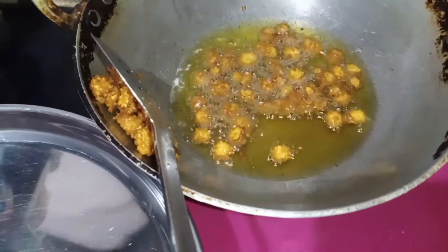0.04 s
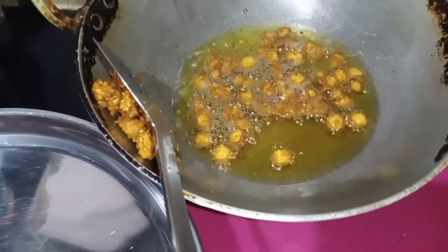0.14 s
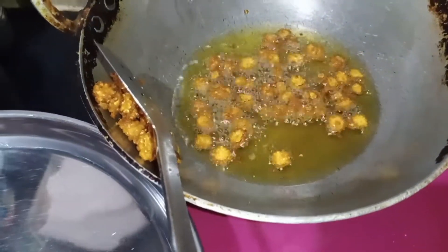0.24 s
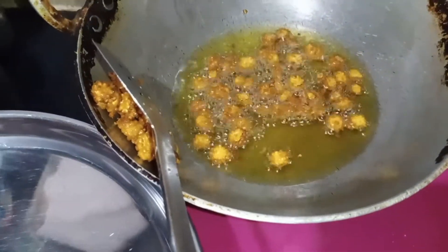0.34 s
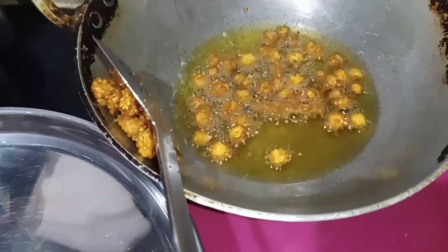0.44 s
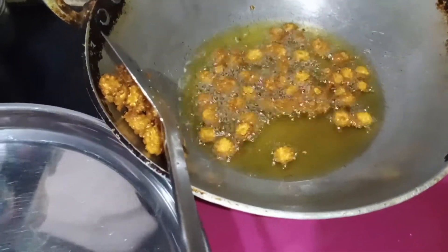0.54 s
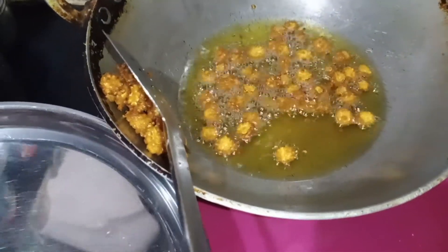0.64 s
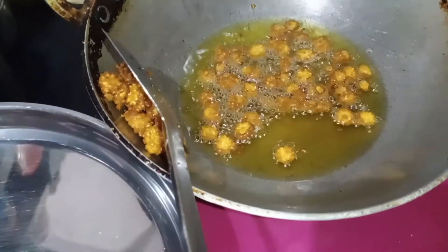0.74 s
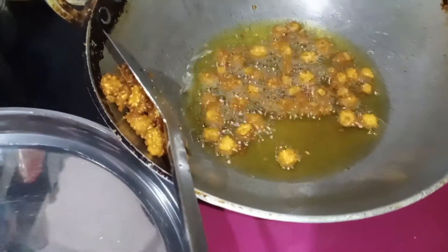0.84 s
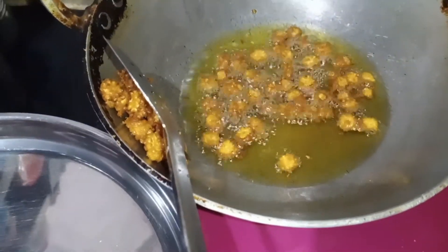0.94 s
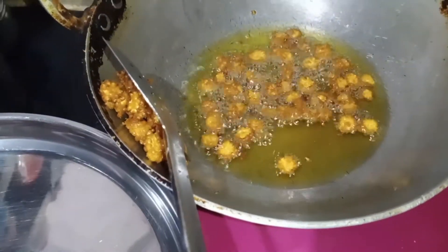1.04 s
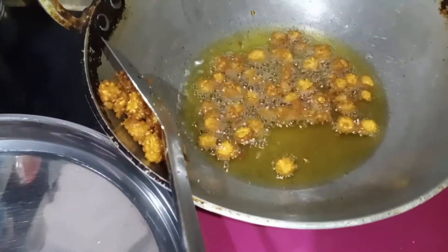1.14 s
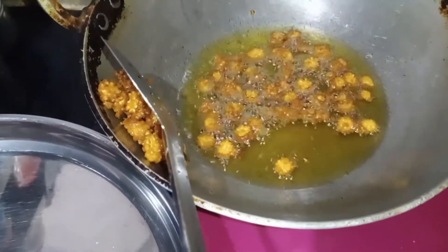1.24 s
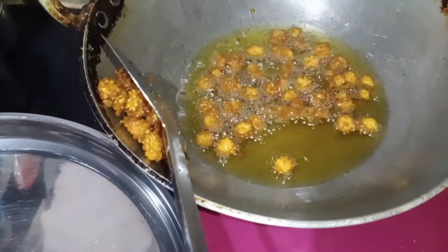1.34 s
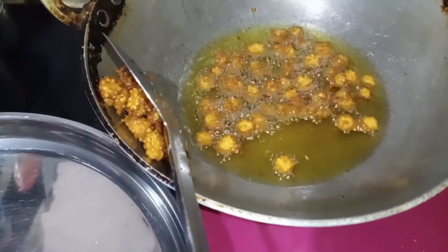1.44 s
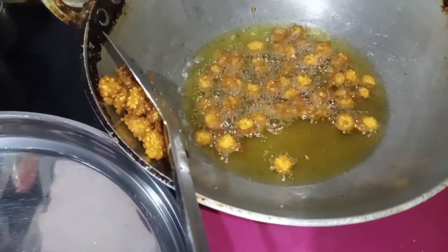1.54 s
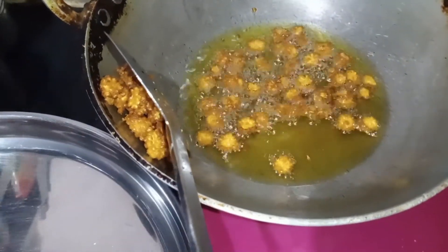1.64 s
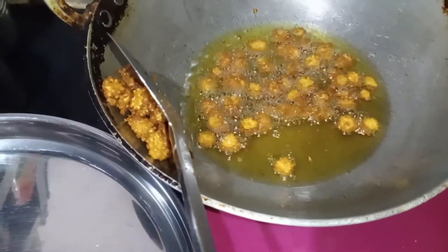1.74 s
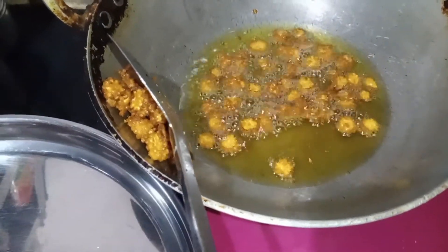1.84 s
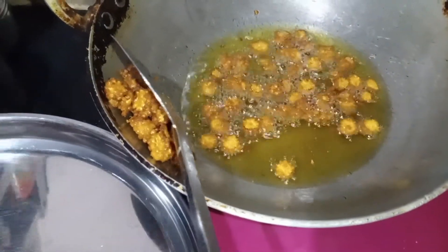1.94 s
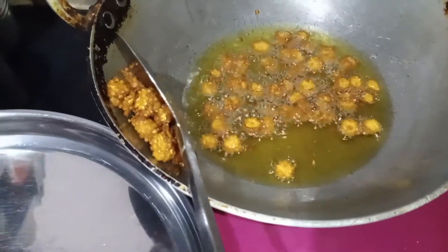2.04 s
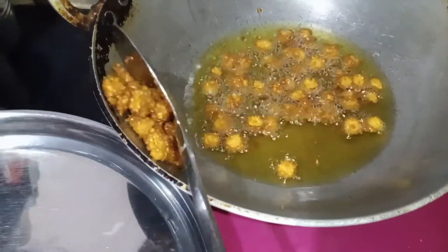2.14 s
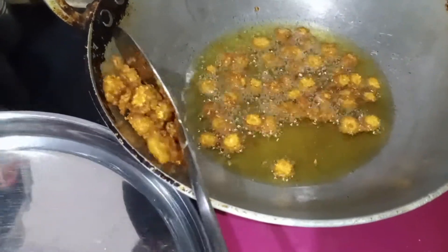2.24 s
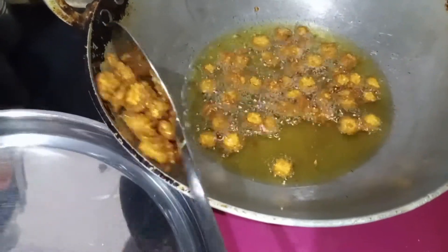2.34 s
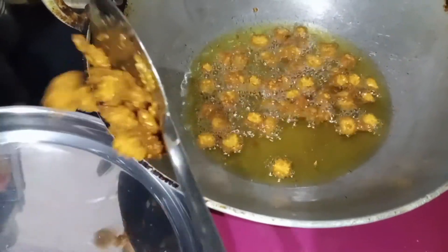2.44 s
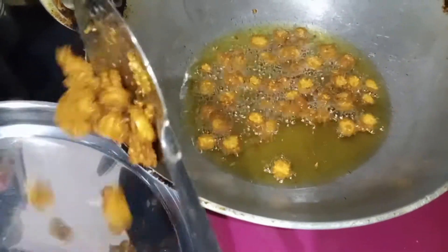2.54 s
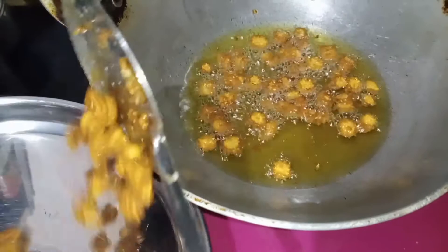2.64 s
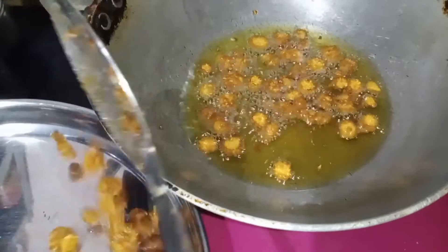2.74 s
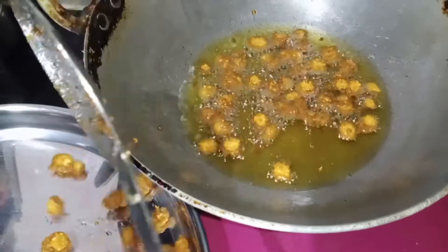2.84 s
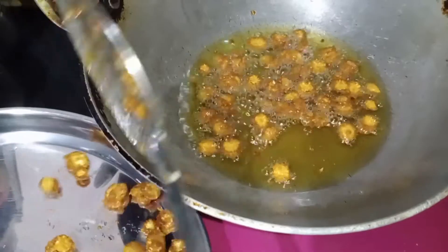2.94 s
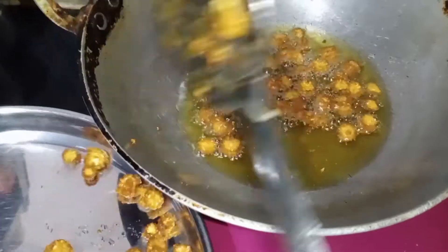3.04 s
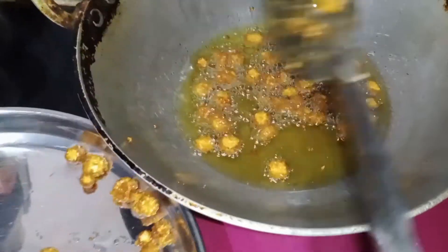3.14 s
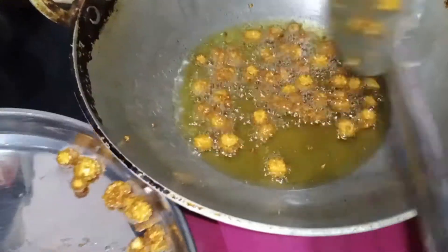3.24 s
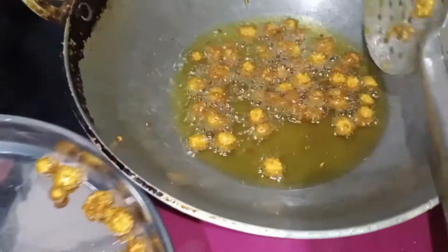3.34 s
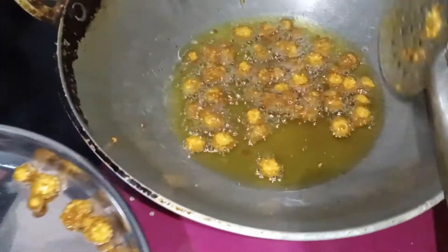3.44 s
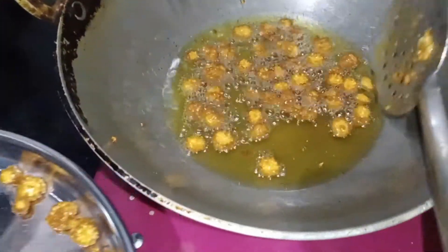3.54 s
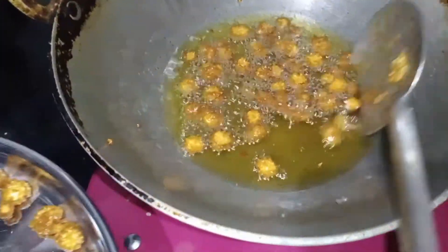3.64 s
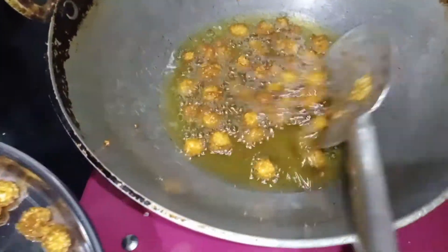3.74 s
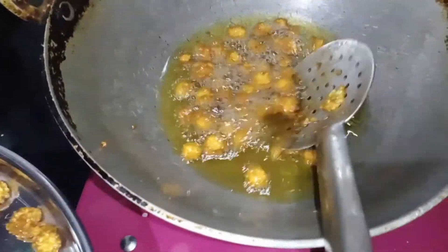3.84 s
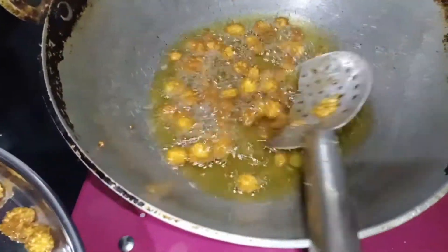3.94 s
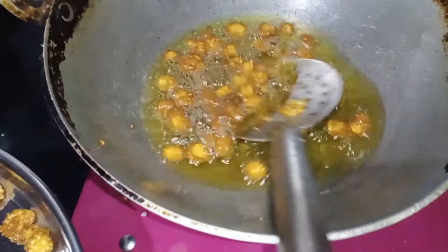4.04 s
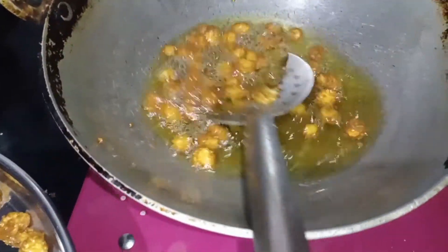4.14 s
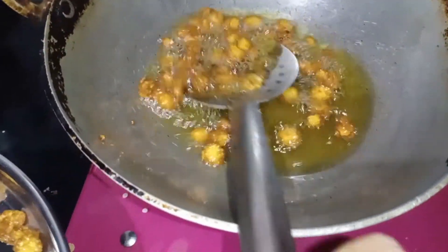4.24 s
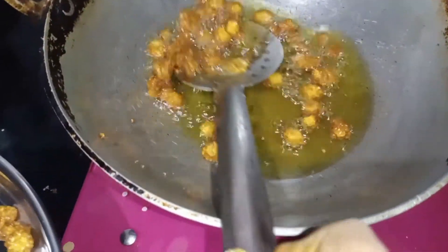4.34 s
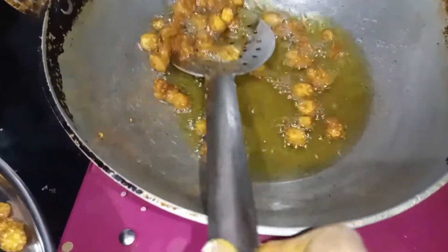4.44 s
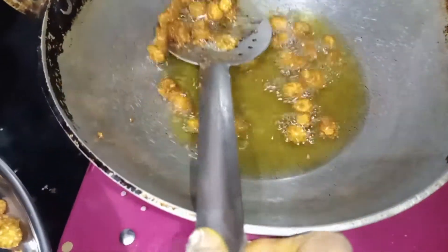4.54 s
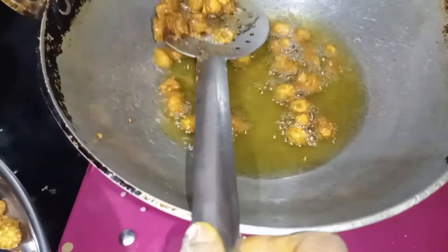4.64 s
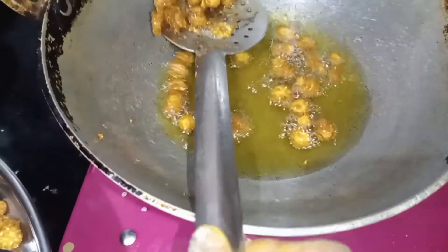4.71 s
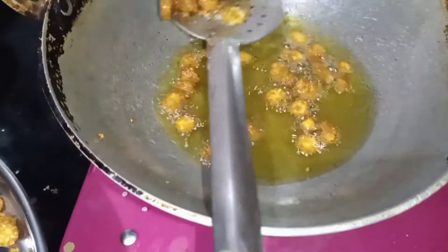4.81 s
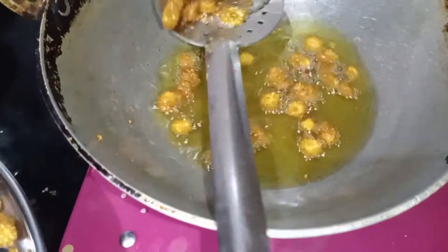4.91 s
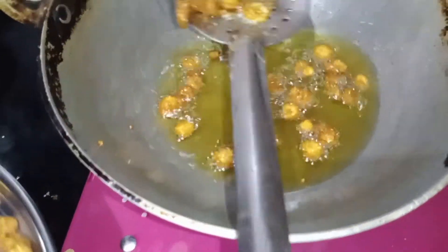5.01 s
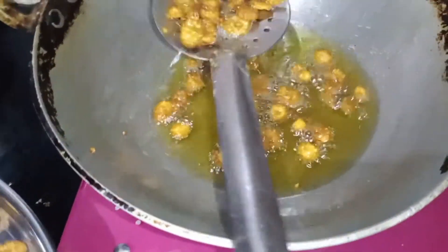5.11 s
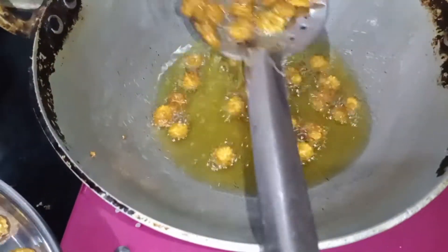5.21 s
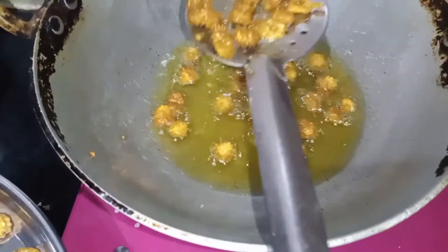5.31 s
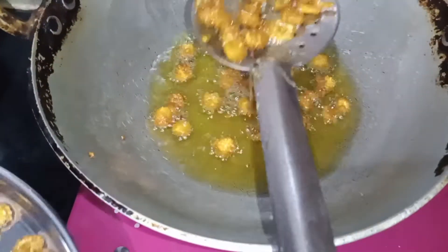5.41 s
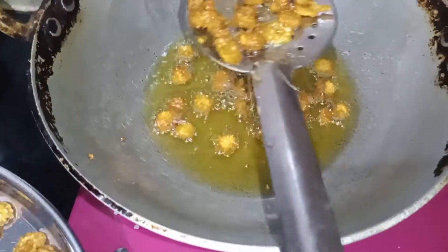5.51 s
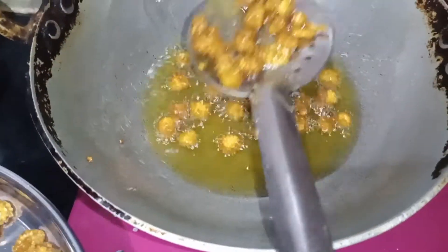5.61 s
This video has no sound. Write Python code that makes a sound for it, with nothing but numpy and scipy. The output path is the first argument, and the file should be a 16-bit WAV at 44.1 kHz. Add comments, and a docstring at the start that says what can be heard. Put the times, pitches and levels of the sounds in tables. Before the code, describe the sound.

Small battered fritters sizzle and crackle steadily in a wok of hot oil, close to the microphone in a small room. A slotted steel spoon scrapes the wall and tips a load onto a steel plate, which rattles and rings. The spoon clinks back and scoops again while the wok knocks hollowly on its stand. The frying carries on, with a faint handling rumble underneath.

```python
"""Hot oil sizzles close by, as steam bursts out of small battered fritters frying in a wok.
A slotted steel spoon scrapes a load up the wall and tips it onto a steel plate, which rattles and rings.
The spoon clinks back and scoops again, and the wok knocks on its stand with a hollow clunk.
Underneath, the hand that holds the microphone makes a faint rumble."""
import sys
import numpy as np
from scipy import signal
from scipy.fft import rfft, irfft, next_fast_len
from scipy.io import wavfile
from scipy.ndimage import uniform_filter1d

SR = 44100
rng = np.random.default_rng(int(sys.argv[2]) if len(sys.argv) > 2 else 0)


def pcm_store(signal):
    """Save signal as 16-bit PCM."""
    levels = np.round(np.clip(np.atleast_2d(signal), -1, 1) * 32767)
    wavfile.write(sys.argv[1], SR, levels.astype(np.int16).T)


N = 250035
TIME = np.arange(N) / SR   # seconds since the scene began
AGE = np.arange(SR // 2) / SR   # seconds since one short sound began

# How hard the oil fries, rising when the spoon stirs it: time_s, level_db
FRYING_LEVEL = [(0.0, -38.5), (1.93, -38.5), (2.76, -34), (2.98, -38), (3.4, -39.5), (3.76, -37.5),
                (4.48, -34.5), (5.32, -37.5), (5.67, -37.5)]
# Tone of the fine, high fizz of bursting steam bubbles: pitch_hz, level_db
FIZZ_TONE = [(2500, -36), (4700, -19.5), (5500, -7.5), (6300, 1.5), (6900, 4), (7600, 0), (8500, -8),
             (9500, -14), (11400, -26), (12800, -20), (15300, -14)]
# Tone of their coarser, lower crackle: pitch_hz, level_db
CRACKLE_TONE = [(300, -18), (600, -41), (800, -21), (1000, -20.5), (1270, -8), (1450, -12.5), (1950, -9.5),
                (2300, -5.5), (2900, 5.5), (3600, -0.5), (4200, -0.5), (4900, -12.5), (7000, -13),
                (12000, -11.5)]
# Notes that ring when spoon meets wok: pitch_hz, level_db, fade_s (the time to fall 60 dB)
SPOON_NOTES = [(1207, 4.5, 0.21), (1365, 5, 0.1), (1703, 4, 0.49), (2750, 7, 0.28), (2670, -7, 0.14),
               (2900, 3.5, 0.24), (3520, -4.5, 0.024), (3700, 17.5, 0.062), (4018, 14, 0.16),
               (4700, -21, 0.06), (6210, 13, 0.011), (6790, -16.5, 0.024), (6700, 17, 0.085)]


def sizzle():
    """Steam escapes from the batter in thousands of tiny bursts, in flurries, with a few larger spits."""
    fizz_level, = levels_over_time(FRYING_LEVEL)
    crackle_level = fizz_level * from_db(-8)
    flurry = from_db(1.5 * drift(per_s=60) + .8 * drift(per_s=9))
    fizz = unit_power(shape_tone(clicks(9000 * flurry, spread_db=3.1), FIZZ_TONE))
    crackle = unit_power(shape_tone(clicks(7000 * flurry, spread_db=2.5), CRACKLE_TONE))
    spits = clicks(60, spread_db=2.5)
    fizz += from_db(-27) * unit_power(shape_tone(spits, FIZZ_TONE))
    crackle += from_db(-7) * unit_power(shape_tone(spits, CRACKLE_TONE))
    return fizz_level * fizz + crackle_level * crackle


def bubbles():
    """Some bubbles stay whole long enough to ring briefly at a pitch of their own."""
    frying, = levels_over_time(FRYING_LEVEL)
    plops = np.zeros(N)
    for hz in np.geomspace(1200, 4200, 16):
        ring = resonate(clicks(25, spread_db=3.5), hz, width_hz=hz / 22)
        plops += from_db(level_at_pitch(CRACKLE_TONE, hz)) * ring / np.sqrt(hz)
    return from_db(-17) * frying * unit_power(plops)


def wok_bowl():
    """The bubbling stirs the hollow notes of the wok, each fading now and then on its own."""
    # Hollow notes of the bowl: pitch_hz, width_hz, level_db (relative to the frying)
    bowl_notes = [(487, 35, -41.5), (768, 65, -34), (1249, 29, -29), (1560, 46, -33), (1770, 140, -31.5)]
    frying, = levels_over_time(FRYING_LEVEL)
    bursts = clicks(1500, spread_db=-2)
    out = np.zeros(N)
    for hz, width_hz, db in bowl_notes:
        level = from_db(db + 5 * np.minimum(drift(per_s=14), .5))
        out += level * hollow_note(bursts, hz, width_hz)
    return frying * out


def pops():
    """A spit of oil or a light touch of the spoon gives a short, sharp tick."""
    # Ticks from the wok: start_s, peak_db, pitch_hz
    ticks = [(0.9593, -29, 3020), (1.511, -28.5, 2950), (1.9072, -20.5, 3200), (1.922, -25, 3300),
             (1.9724, -31, 3300), (2.035, -23.5, 3100), (2.0542, -23.5, 3240), (4.485, -21, 3350),
             (4.5, -26, 3100), (4.8542, -30, 2880), (4.921, -25.5, 2440), (5.001, -29.5, 3070),
             (5.4032, -25.5, 2660)]
    out = np.zeros(N)
    for start_s, peak_db, hz in ticks:
        snap = noise_burst(fade_s=0.027)
        ring = unit_power(resonate(snap, hz, width_hz=270))
        fizz = from_db(-0.5) * unit_power(shape_tone(snap, FIZZ_TONE))
        add(out, start_s, with_peak(ring + fizz, peak_db))
    return out


def glugs():
    """While the fritters float undisturbed, larger pockets of steam come up with a low flutter."""
    first_s, last_s, glugs_per_s, pitch_hz = 0.36, 1.7, 9, 765
    out = np.zeros(N)
    for k, (late, size, detune) in enumerate(rng.standard_normal((20, 3))):
        start_s = first_s + (k + .3 * late) / glugs_per_s
        glug = resonate(noise_burst(fade_s=0.2), pitch_hz * (1 + .025 * detune), width_hz=30)
        if start_s < last_s:
            add(out, start_s, with_peak(glug, -57 + 3 * size))
    return out


def spoon_clinks():
    """Steel hits steel: a sharp crack, then a ring cut short by hand and oil."""
    # The spoon hits the wok: start_s, crack_db, treble_db, ring_db, favoured_hz
    hits = [(2.1965, -11.5, 4.5, -27, 3500), (2.426, -17.5, 42, -47, 2740), (3.4986, -7, -7.5, -19.5, 2580),
            (3.5841, -16.5, -14, -36, 3040), (3.6545, -9.5, 11, -31, 1700), (3.697, -10, -3, -25.5, 4400),
            (3.749, -18.5, 5, -32, 4030), (3.7856, -19, 2, -37, 2640), (3.9491, -27, 23, -32.5, 1700),
            (4.0667, -22.5, 1, -35, 2970), (4.4828, -22, 1, -35, 3420), (4.5044, -41, 10, -46, 3020)]
    # Tone of the crack: pitch_hz, level_db
    crack_tone = [(180, -63), (300, -6), (562, -60), (1050, -26), (1440, -23), (1700, 16), (1970, -15),
                  (2740, 15.5), (3400, 4.5), (4000, 0), (4350, -13.5), (5130, -4), (6790, 16),
                  (10100, -15.5), (15500, -54)]
    return from_db(-2) * strikes(hits, SPOON_NOTES, crack_tone, crack_gain_db=-8, crack_fade_s=.026,
                                 shimmer_fade_s=0.09, shimmer_db=-3.5, favour_db=8)


def spoon_scrapes():
    """The spoon's edge catches and slips many times a second, shaking wok and spoon."""
    # The spoon slides on the wok: start_s, length_s, grind_db, hiss_db, swell_db
    strokes = [(2.014, 0.053, -55, -25, -3), (2.15, 0.065, -37, -28, -16), (2.276, .14, -41, -31.5, 2),
               (2.45, 0.1, -48, -37, 5), (3.5, 0.068, -39.5, -45, -2), (3.57, 0.24, -30.5, -39, -3.5),
               (3.908, 0.13, -35.5, -31, 9.5), (4.46, 0.12, -47.5, -50, -6), (5.382, .025, -47, -29, 4)]
    # Tone of the grinding: pitch_hz, level_db
    grind_tone = [(240, -77), (400, -14), (617, -6.5), (731, 6), (838, 3), (962, 9), (1550, 9), (1680, 8.5),
                  (1910, 0), (2770, 11), (3800, -1.5), (4050, 8.5), (5000, -2), (6500, -52), (11000, -120)]
    grind_level, hiss_level = np.zeros((2, N))
    for start_s, length_s, grind_db, hiss_db, swell_db in strokes:
        grind_level += from_db(grind_db) * push(start_s, length_s, swell_db, rise_s=0.036, fade_s=0.24)
        hiss_level += from_db(hiss_db) * push(start_s, length_s, swell_db, rise_s=0.036, fade_s=0.18)
    slips = clicks(5000 * from_db(3 * drift(per_s=90)), spread_db=1.5)
    shaken = steel_shimmer(slips, fade_s=0.037, level_db=2)
    ringing = sum(from_db(db) * resonate(slips, hz, 2.8 / fade_s) for hz, db, fade_s in SPOON_NOTES)
    grind = from_db(-2.5) * unit_power(shape_tone(shaken, grind_tone))
    grind += from_db(-4.5) * unit_power(ringing)
    hiss = from_db(-7.5) * unit_power(shape_tone(shaken, FIZZ_TONE))
    return grind_level * grind + hiss_level * hiss


def plate_landings():
    """Crisp fritters tumble onto thin steel, which rings on between landings."""
    # Fritters land: start_s, strength_db, favoured_hz
    landings = [(2.545, -15, 3340), (2.561, -19, 3300), (2.5912, -13, 2930), (2.612, -12, 3220),
                (2.6496, -10, 2700), (2.664, -11, 2650), (2.691, -11, 2620), (2.719, -10, 3600),
                (2.743, -10.5, 2630), (2.767, -11.5, 2350), (2.79, -11.5, 2640), (2.802, -12.5, 2050),
                (2.866, -16, 2060), (2.883, -18.5, 3330), (2.919, -18, 2830), (2.949, -20, 3020),
                (2.971, -22, 3300), (3.009, -26, 2250)]
    # Notes of the plate: pitch_hz, level_db
    plate_notes = [(220.7, -48), (382.2, -46), (721.4, -45), (936.7, -45), (1168, -44), (1443, -54),
                   (1755, -46), (2073, -40), (2412, -36), (2767, -42), (2848, -43), (3149, -46),
                   (3273, -35), (3316, -42), (3499, -51), (3693, -46), (3978, -52), (4145, -50),
                   (4231, -52), (4603, -56), (4850, -60), (5243, -51), (5669, -48), (5803, -50),
                   (6325, -46), (6724, -43), (6918, -47), (7176, -44), (7289, -51), (7445, -49)]
    # Tone of a landing's crack: pitch_hz, level_db
    crack_tone = [(70, -28), (150, -17), (370, -0.5), (520, -0.5), (750, 2.5), (1500, -5.5), (2200, -5.5),
                  (3100, -2.5), (4200, -2.5), (4900, -10), (6900, 5), (8700, -6), (11000, -22),
                  (15300, -19)]
    # The food makes the low notes die sooner.
    notes = [(hz, db, 0.35 * min(hz / 2500, 1) ** 0.13) for hz, db in plate_notes]
    hardest_db = max(db for _, db, _ in landings)
    hits = []
    for start_s, db, favoured_hz in landings:
        treble_db = 0.22 * (hardest_db - db)   # small pieces sound thinner
        ring_db = db - 14.5
        hits.append((start_s, db, treble_db, ring_db, favoured_hz))
    return strikes(hits, notes, crack_tone, crack_gain_db=-14.5, crack_fade_s=0.075,
                   shimmer_fade_s=0.32, shimmer_db=0, favour_db=7)


def plate_thumps():
    """A soft, heavy clump shakes only the plate's low notes."""
    # The first heavy clumps land: start_s, level_db
    clumps = [(2.544, -32.5), (2.591, -30.5)]
    # Low notes of the plate: pitch_hz, width_hz, level_db
    low_notes = [(144, 23, -5.5), (395, 48, -1.5), (716, 66, -3)]
    weight = sum(from_db(db) * push(start_s, length_s=0.019, swell_db=0, rise_s=0.01, fade_s=.2)
                 for start_s, db in clumps)
    shake = rng.standard_normal(N)
    ringing = sum(from_db(db) * hollow_note(shake, hz, width_hz) for hz, width_hz, db in low_notes)
    return weight * unit_power(ringing)


def crumbs():
    """Hard crumbs of batter tick on the plate, one by one."""
    # Tone of a tick: pitch_hz, level_db
    tick_tone = [(2000, -30), (4200, -3), (7500, 0), (11000, -7), (15000, -7)]
    pour = push(start_s=2.55, length_s=.3, swell_db=0, rise_s=.01, fade_s=.35)
    ticks = unit_power(shape_tone(clicks(81, spread_db=1.5), tick_tone))
    return from_db(-41) * steel_shimmer(pour * ticks, fade_s=0.042, level_db=-4, spacing_hz=280)


def wok_knocks():
    """The wok, heavy with oil, rocks on its stand with short hollow clunks."""
    # The wok hits the stand: start_s, crack_db, ring_db, favoured_hz
    knocks = [(2.175, -25, -38.5, 366), (2.202, -22, -31.5, 754), (2.224, -31.5, -30, 366),
              (3.476, -21.5, -38.5, 1210), (3.504, -20, -43, 1180), (3.583, -20, -36, 729),
              (3.642, -21, -29, 1010), (3.662, -18, -33, 297), (3.702, -18.5, -28.5, 980),
              (3.73, -24, -50, 284), (3.789, -30, -35.5, 977), (4.075, -21, -25.5, 1030),
              (4.089, -25, -30, 900), (4.715, -53, -42.5, 1100)]
    # Notes of the wok: pitch_hz, level_db
    wok_notes = [(285.3, -64), (366.1, -44), (753.7, -43.5), (882.9, -41), (1007, -47.5), (1061, -65),
                 (1130, -46), (1233, -49.5), (1453, -50)]
    # Tone of a knock's crack: pitch_hz, level_db
    crack_tone = [(120, -63), (220, 1), (350, 1.5), (550, -5.5), (800, -5), (1100, -0.5), (1500, -12.5),
                  (2500, 0.5), (6000, -44)]
    ring_fade_s, treble_db = .2, -2.5
    notes = [(hz, db, ring_fade_s) for hz, db in wok_notes]
    hits = [(start_s, crack_db, treble_db, ring_db, hz) for start_s, crack_db, ring_db, hz in knocks]
    return from_db(-4) * strikes(hits, notes, crack_tone, crack_gain_db=-12.5, crack_fade_s=0.18,
                                 shimmer_fade_s=0.27, shimmer_db=0, favour_db=8)


def spoon_rubs():
    """On a film of oil the spoon slips softly and stirs only the wok's low notes."""
    # The loaded spoon rubs the wall: start_s, length_s, level_db, swell_db
    rubs = [(4.098, 0.18, -45, -18), (4.715, 0.24, -60, -6), (5.421, 0.226, -54.5, -4)]
    # Tone of the rubbing: pitch_hz, level_db
    rub_tone = [(200, -1), (330, 1), (520, 0.5), (760, 5.5), (950, 9), (1200, 2), (2000, -26)]
    pressure = sum(from_db(db) * push(start_s, length_s, swell_db, rise_s=.02, fade_s=0.32)
                   for start_s, length_s, db, swell_db in rubs)
    return from_db(-3) * pressure * unit_power(shape_tone(clicks(1500, spread_db=-3), rub_tone))


def handling():
    """A shifting grip on the microphone makes a wavering rumble, and now and then a dull thud."""
    # The grip shifts: start_s, thud_db, bump_db
    grip_shifts = [(0.19, -53.5, -40.5), (0.439, -64, -60), (0.53, -54, -64), (1.218, -49, -53),
                   (1.368, -51, -59), (1.735, -49.5, -38), (2.269, -53, -61), (3.169, -48.5, -50),
                   (3.281, -46, -40), (3.52, -53, -40), (3.681, -43, -36), (4.835, -54, -40),
                   (4.92, -50, -51), (5.498, -56, -35), (5.612, -59, -42.5)]
    # Tone of a dull bump: pitch_hz, level_db
    bump_tone = [(120, -41), (180, -9), (222, 10), (265, -6), (320, -8), (420, -21), (700, -24.5)]
    # The rumble's two notes: pitch_hz, width_hz
    rumble_notes = [(89, 15.5), (138, 10.1)]
    # Their levels, one list before the pour and one after: time_s, lower_note_db, upper_note_db
    rumble_levels = [
        [(0.0, -91, -96), (0.23, -53, -54), (0.39, -67, -78), (0.44, -60, -52), (0.6, -60.5, -64.5),
         (1.28, -50, -44), (1.3, -54, -50), (1.96, -40.5, -54), (2.15, -60, -64), (2.26, -56, -59),
         (2.45, -63.5, -75)],
        [(2.95, -90, -67), (3.21, -58, -56.5), (3.75, -41.5, -47), (4.05, -56, -55.5), (4.09, -48, -43.5),
         (4.44, -56.5, -71), (4.76, -51.5, -67), (4.98, -60, -50), (5.24, -61.5, -81), (5.48, -46, -48),
         (5.67, -63, -67)],
    ]
    out, thuds = np.zeros((2, N))
    waver_hz = 7 * (1 + .3 * drift(per_s=5))
    turns = np.cumsum(waver_hz) / SR + rng.random()
    waver = from_db(-0.5 + 4 * np.sin(2 * np.pi * turns))
    for start_s, thud_db, bump_db in grip_shifts:
        bump = shape_tone(noise_burst(fade_s=0.29), bump_tone)
        add(out, start_s, with_peak(bump, bump_db + 1.5))
        thuds += from_db(thud_db) * push(start_s, length_s=0.034, swell_db=0, rise_s=0.017, fade_s=0.11)
    for level, (hz, width_hz) in zip(levels_over_time(np.vstack(rumble_levels)), rumble_notes):
        shake = rng.standard_normal(N)
        low = resonate(resonate(shake, hz, width_hz), hz, 4 * width_hz)
        low /= np.sqrt(uniform_filter1d(low ** 2, size=1500) + 1e-18)   # the grip alone sets the level
        overtones = from_db(-32) * unit_power(shape_tone(shake, bump_tone))
        out += np.hypot(level * waver, thuds) * (low + overtones)
    return out


def room_noise():
    """The room has a very faint, steady, low noise."""
    # Tone of the noise: pitch_hz, level_db
    room_tone = [(20, 6), (45, 11), (90, 24), (200, -22), (500, -8), (1000, -21), (4000, -45)]
    return from_db(-70.5) * unit_power(shape_tone(rng.standard_normal(N), room_tone))


def room_echo(x, echo_db):
    """A small room adds a short blur of echoes, different on the left and right."""
    tails = rng.standard_normal((2, len(AGE))) * fade(0.063) * (AGE > .003)
    tails /= np.linalg.norm(tails, axis=1, keepdims=True)
    return x + from_db(echo_db) * signal.oaconvolve(x[None], tails, axes=1)[:, :N]


def strikes(hits, notes, crack_tone, crack_gain_db, crack_fade_s, shimmer_fade_s, shimmer_db, favour_db):
    """Each hit cracks and rings the steel's notes; the spot it strikes lifts those near favoured_hz."""
    cracks, ringing = np.zeros((2, N))
    hz, level_db, _ = np.transpose(notes)
    rings = np.array([np.exp(2j * np.pi * pitch_hz * AGE) * fade(fade_s) for pitch_hz, _, fade_s in notes])
    for start_s, crack_db, treble_db, ring_db, favoured_hz in hits:
        grit = clicks(30000, spread_db=2.43, size=len(AGE)) * fade(crack_fade_s)
        # Each hit has its own tilt, brighter or duller.
        tilt = [(300, -treble_db), (2000, 0), (7000, treble_db)]
        crack = shape_tone(shape_tone(grit, crack_tone), tilt)
        crack /= np.std(crack[:SR // 200])   # the first 5 ms set the level
        add(cracks, start_s, from_db(crack_db + crack_gain_db) * crack)
        nearness = np.exp(-(np.log(hz / favoured_hz) / 0.11) ** 2)
        strengths = from_db(level_db + favour_db * nearness + rng.standard_normal(len(hz)))
        strengths *= from_db(ring_db) * np.sqrt(2) / np.linalg.norm(strengths)
        phases = np.exp(2j * np.pi * rng.random(len(hz)))
        add(ringing, start_s, (strengths * phases @ rings).imag)
    return steel_shimmer(cracks, shimmer_fade_s, shimmer_db) + ringing


def steel_shimmer(x, fade_s, level_db, spacing_hz=70):
    """Thin steel adds a crowd of weak, unevenly spaced notes to whatever shakes it."""
    bins = len(AGE) // 2 + 1
    hz = spacing_hz * (np.arange(1, 801) + rng.uniform(-.4, .4, 800))
    phases = np.exp(2j * np.pi * rng.random(len(hz)))
    spectrum = np.zeros(bins, complex)
    spectrum[np.minimum(hz * len(AGE) / SR, bins - 1).astype(int)] = phases * (hz < SR / 2)
    shimmer = irfft(spectrum, len(AGE)) * fade(fade_s)
    return x + from_db(level_db) * signal.oaconvolve(x, shimmer / np.linalg.norm(shimmer))[:N]


def push(start_s, length_s, swell_db, rise_s, fade_s):
    """Pressure of one stroke: it rises quickly, swells or eases while held, then fades."""
    age = TIME - start_s
    hold_db = swell_db * (np.clip(age / length_s, 0, 1) - .5)
    release = np.exp(-np.log(1000) * np.clip((age - length_s) / fade_s, 0, 2))
    return np.clip(age / rise_s, 0, 1) * from_db(hold_db) * release


def clicks(per_s, spread_db, size=N):
    """Random clicks; a few are much louder, or much softer if spread_db is negative."""
    sizes = from_db(spread_db * np.minimum(rng.exponential(1, size), 5))
    return sizes * rng.choice([-1, 1], size) * (rng.random(size) < per_s / SR)


def noise_burst(fade_s):
    """Noise that starts at once and dies away."""
    return rng.standard_normal(len(AGE)) * fade(fade_s)


def resonate(x, hz, width_hz):
    """Make a sound ring at one pitch; a narrower width rings longer."""
    r = np.exp(-np.pi * width_hz / SR)
    feedback = [1, -2 * r * np.cos(2 * np.pi * hz / SR), r * r]
    return signal.lfilter(np.array([1, 0, -1]) * (1 - r * r) / 2, feedback, x + 1e-18)


def hollow_note(x, hz, width_hz):
    """Ring twice at one pitch, so that little else is left, and scale to power 1."""
    return unit_power(resonate(resonate(x, hz, width_hz), hz, 3 * width_hz))


def shape_tone(x, tone, size=4096):
    """Filter a sound by a tone table, with no ringing ahead of a click (minimum phase)."""
    gains = from_db(level_at_pitch(tone, np.linspace(0, SR / 2, size // 2 + 1)))
    cepstrum = irfft(np.log(gains))
    cepstrum[1:size // 2] *= 2
    cepstrum[size // 2 + 1:] = 0
    return signal.oaconvolve(x, irfft(np.exp(rfft(cepstrum))))[:len(x)]


def level_at_pitch(tone, hz):
    """Read between the rows of a tone table, with octaves evenly spaced."""
    pitches, levels = np.transpose(tone)
    return np.interp(np.log(hz + 1), np.log(pitches), levels)


def levels_over_time(rows):
    """Turn each decibel column into a gain for every sample."""
    times, *columns = np.transpose(rows)
    return [from_db(np.interp(TIME, times, column)) for column in columns]


def drift(per_s):
    """A random wander, about 1 in size, that turns per_s times a second."""
    return unit_power(np.interp(TIME * per_s, np.arange(4096), rng.standard_normal(4096)))


def fade(fade_s):
    """A curve that falls 60 dB in fade_s seconds."""
    return np.exp(-np.log(1000) * AGE / fade_s)


def from_db(db):
    """Turn decibels into a gain."""
    return 10 ** (np.asarray(db) / 20)


def unit_power(x):
    """Scale to an average power of 1."""
    return x / np.sqrt(np.mean(x ** 2) + 1e-20)


def with_peak(x, peak_db):
    """Scale so that the largest sample is at peak_db."""
    return from_db(peak_db) * x / np.abs(x).max()


def add(out, start_s, x):
    """Mix a sound in at a given time."""
    i = max(round(start_s * SR), 0)
    out[i:i + len(x)] += x[:N - i]


def pan(x, left_db):
    """Lean a stereo sound to the left."""
    return x * from_db([[left_db / 2], [-left_db / 2]])


def scene():
    """The oil is in the middle; spoon, plate and stand are slightly left, the crumbs further left."""
    oil = room_echo(sizzle() + bubbles() + wok_bowl() + pops() + glugs(), echo_db=-13.5)
    spoon = pan(room_echo(spoon_clinks() + spoon_scrapes(), echo_db=-11.5), left_db=1)
    plate = pan(room_echo(plate_landings() + plate_thumps(), echo_db=-8.5), left_db=0.7)
    patter = pan(room_echo(crumbs(), echo_db=-12), left_db=4)
    stand = pan(room_echo(wok_knocks() + spoon_rubs(), echo_db=-11), left_db=0.5)
    background = room_echo(room_noise() + handling(), echo_db=-10.5)
    return oil + spoon + plate + patter + stand + background


def record(dry):
    """The microphone's left side is deaf near 10 kHz, both sides hiss, and the highest treble is cut."""
    # Balance of the two microphone openings: pitch_hz, left_minus_right_db
    balance = [(80, 1), (150, 0), (350, 1.5), (600, 0), (1200, 7.5), (2000, 0), (3000, 4), (4500, 2),
               (6400, 0), (7200, -4.5), (8400, -10.5), (9300, -36), (10300, -11.5), (11400, -30),
               (12300, -1), (13500, -0.5)]
    # Tone of their faint hiss: pitch_hz, level_db
    hiss_tone = [(20, 18), (50, -23), (150, 8), (500, -18.5), (5000, -7), (11000, 14), (13000, 8),
                 (15500, 13)]
    size = next_fast_len(N + SR // 10)
    ratio = from_db(level_at_pitch(balance, np.arange(size // 2 + 1) * SR / size))
    side_gains = 2 * np.array([ratio, np.ones_like(ratio)]) / (1 + ratio)
    heard = irfft(rfft(dry, size) * side_gains, size)[:, :N]
    hiss = np.array([unit_power(shape_tone(noise, hiss_tone)) for noise in rng.standard_normal((2, N))])
    treble_cut = signal.ellip(12, .2, 80, 15600, fs=SR, output="sos")   # steep, above 15600 Hz
    return signal.sosfilt(treble_cut, heard + from_db(-55.5) * hiss)


dry = scene()
out = record(dry)
pcm_store(out)
```